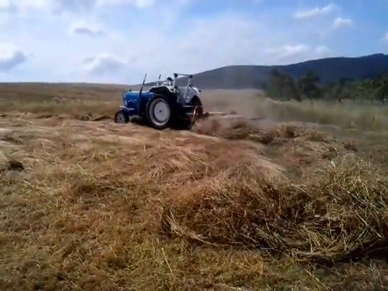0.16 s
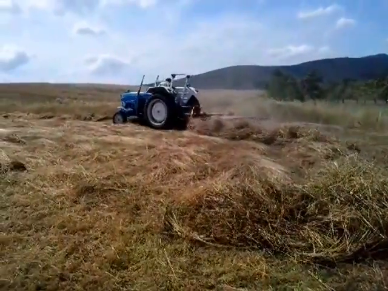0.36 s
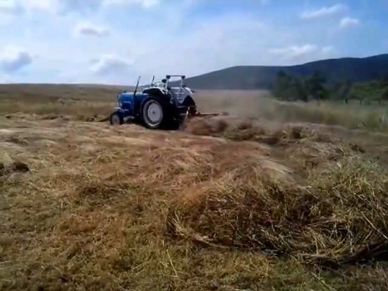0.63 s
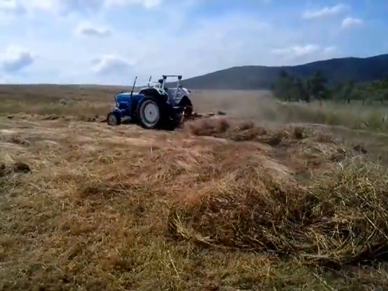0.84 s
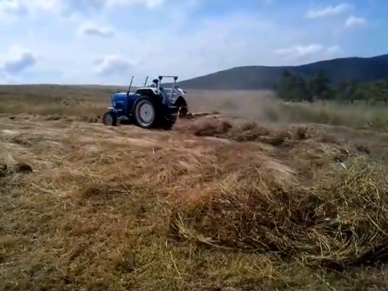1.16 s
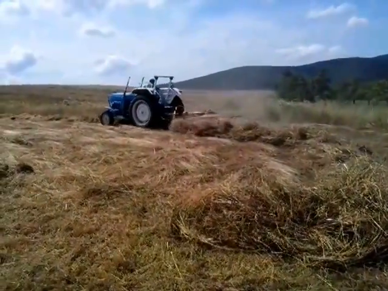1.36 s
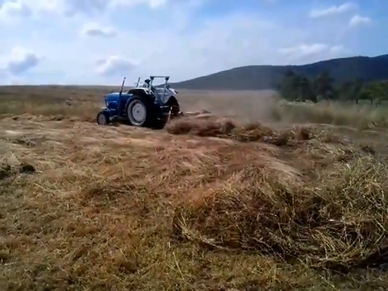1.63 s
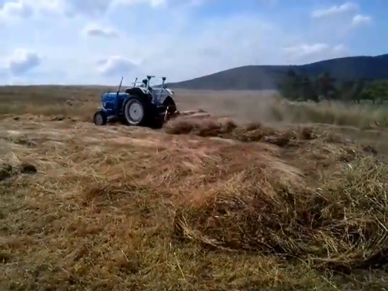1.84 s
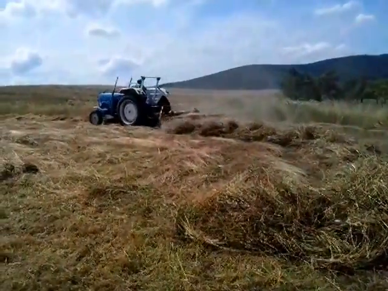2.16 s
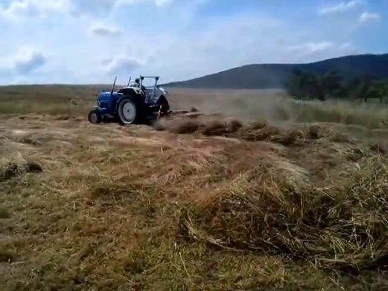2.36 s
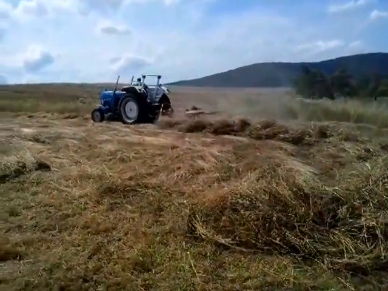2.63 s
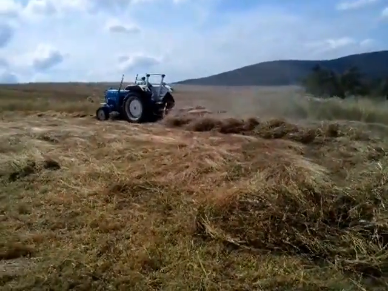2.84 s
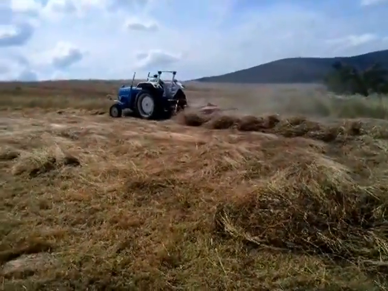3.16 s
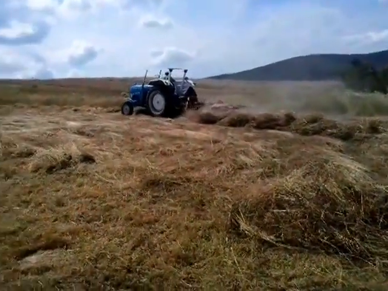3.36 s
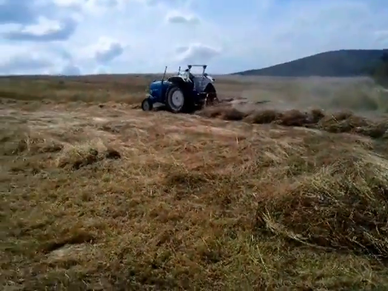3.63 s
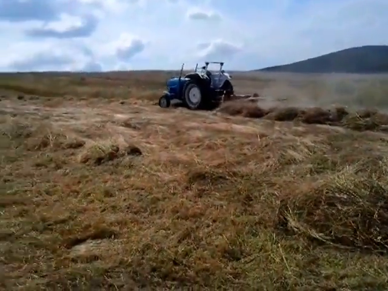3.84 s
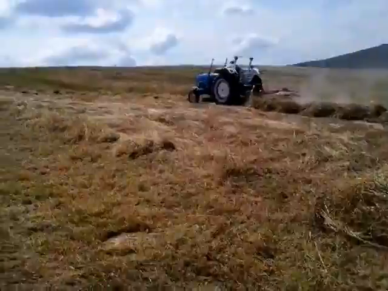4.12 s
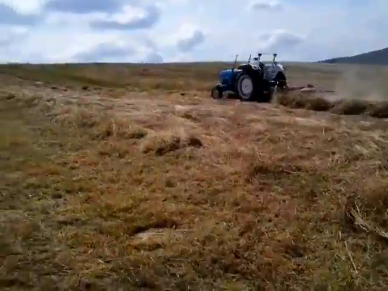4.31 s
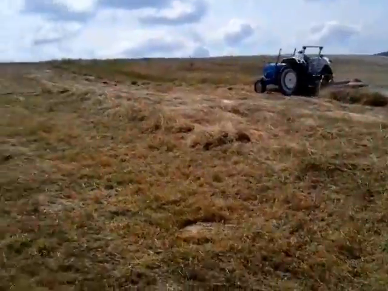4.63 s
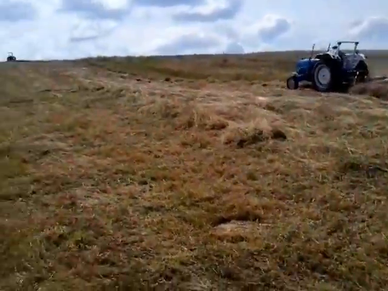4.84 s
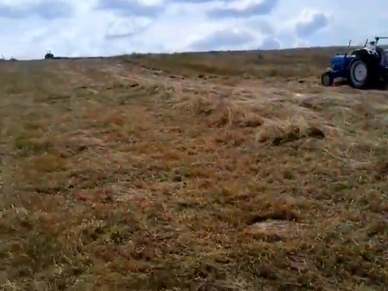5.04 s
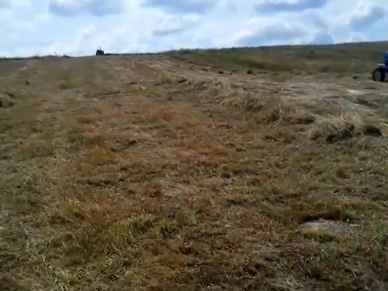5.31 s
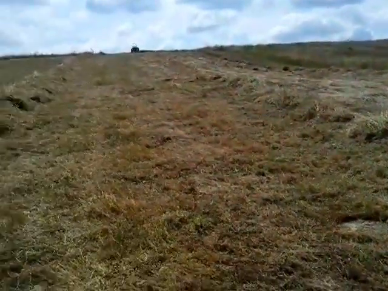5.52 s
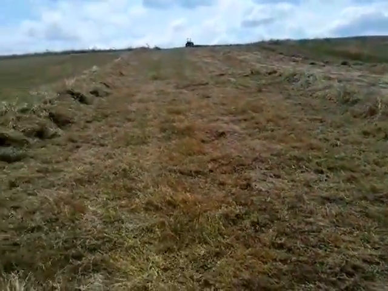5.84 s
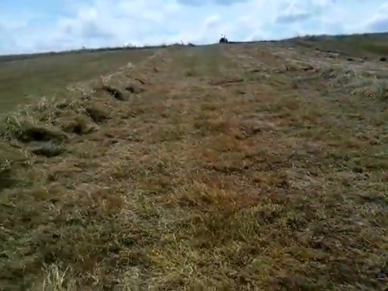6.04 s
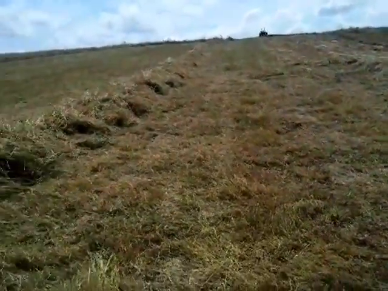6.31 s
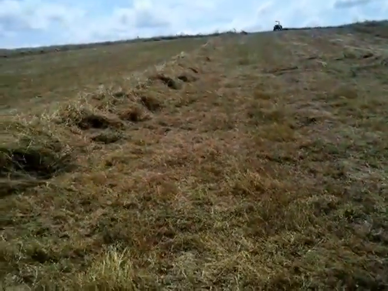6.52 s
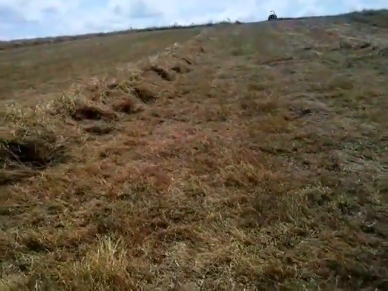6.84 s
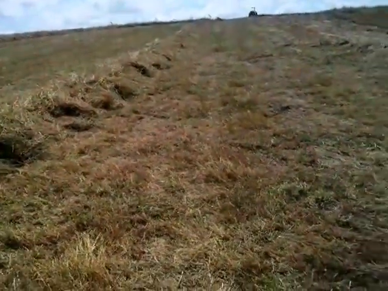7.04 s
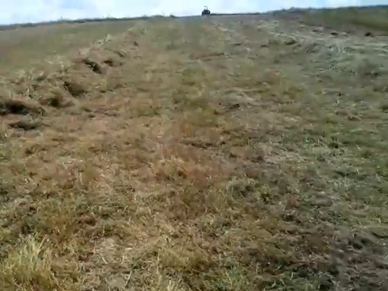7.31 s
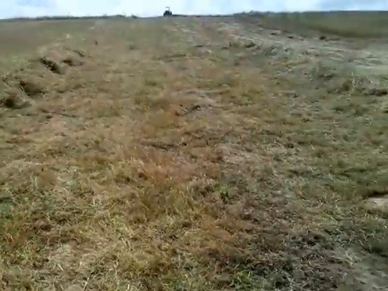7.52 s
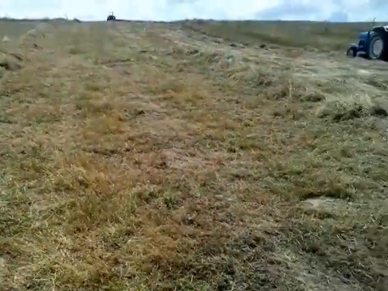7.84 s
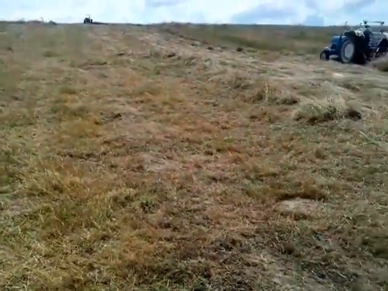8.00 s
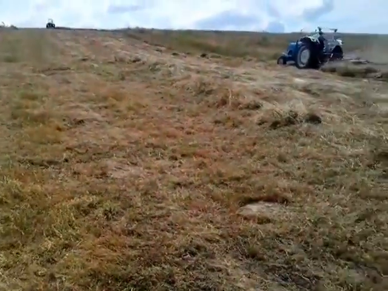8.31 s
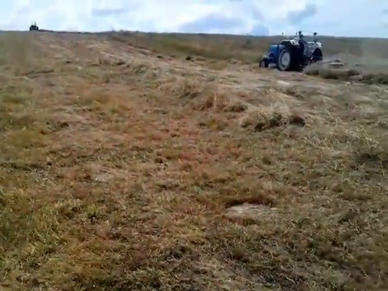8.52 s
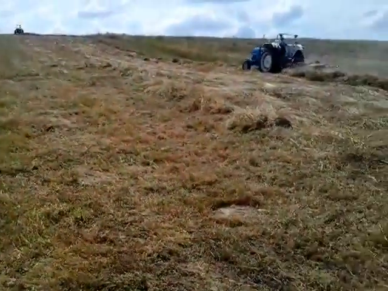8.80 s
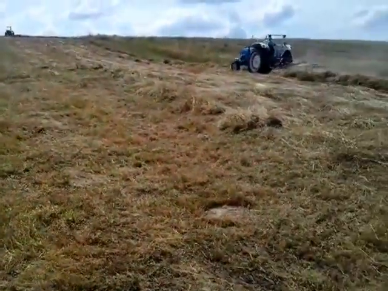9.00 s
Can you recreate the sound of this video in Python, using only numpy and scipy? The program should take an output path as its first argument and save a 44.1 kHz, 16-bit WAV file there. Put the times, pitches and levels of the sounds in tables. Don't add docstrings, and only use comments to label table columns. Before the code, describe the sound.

A diesel tractor throbs steadily some way off, its hay rake rattling and swishing through dry stalks, while wind gusts thump the microphone.

```python
import sys
import numpy as np
from scipy import signal
from scipy.fft import rfft, irfft, next_fast_len
from scipy.io import wavfile
from scipy.ndimage import uniform_filter1d, map_coordinates

SR = 44100
rng = np.random.default_rng(int(sys.argv[2]) if len(sys.argv) > 2 else 0)


def voltage_ratio(decibels):
    exponent = np.asarray(decibels, float) / 20
    return 10 ** exponent


def pcm_store(signal):
    levels = np.round(np.clip(np.atleast_2d(signal), -1, 1) * 32767)
    wavfile.write(sys.argv[1], SR, levels.astype(np.int16).T)


N = 403956
TIME = np.arange(N) / SR


def unit(x):
    return x / np.sqrt(np.mean(x ** 2) + 1e-20)


def along(points, hz):
    f, v = np.transpose(points)
    return np.interp(np.log(hz + 1), np.log(f + 1), v)


def curves(rows):
    s, *cols = np.transpose(rows)
    return [np.interp(TIME, s, c) for c in cols]


def wobble(rate):
    coarse = TIME[::32]
    knots = rng.standard_normal(int(N * rate / SR) + 4)
    return np.interp(TIME, coarse, map_coordinates(knots, [coarse * rate]))


def filtered(x, response):
    m = next_fast_len(N + SR // 2)
    return irfft(rfft(x, m) * response(np.fft.rfftfreq(m, 1 / SR)), m)[..., :N]


def add(track, s, shape):
    part = track[round(s * SR):][:len(shape)]
    part += shape[:len(part)]


def firings():
    # (time [s], rate [firings/s])
    firing_rate = [(0, 35.9), (1.1, 35.9), (1.4, 35.54), (3.15, 35.54), (3.4, 36.03), (6.9, 36.03),
                   (7.1, 36.3), (7.95, 36.3), (8.15, 36), (9.2, 36)]
    on_beat = 2.5035
    count = np.cumsum(curves(firing_rate)[0]) / SR
    return count - np.interp(on_beat, TIME, count)


def exhaust(count):
    cylinders = [0, 0.32, 1]
    # (frequency [Hz], level [dB])
    pipe_colour = [(40, -32), (55, -21), (72, -3.5), (108, -3), (144, -2.5), (180, 0.5), (215, -5.5),
                   (252, 1), (290, -7.5), (400, -22), (900, -30)]
    at = np.flatnonzero(np.diff(np.floor(count)) > 0)
    strength_db = np.array(cylinders)[np.arange(len(at)) % len(cylinders)]
    pulses = np.zeros(N)
    pulses[at] = voltage_ratio(strength_db + 1.3 * rng.standard_normal(len(at)))

    def pipe(f):
        smear = np.exp(-1.9j * np.log(1 + f / 150))
        return voltage_ratio(along(pipe_colour, f)) * smear
    return unit(filtered(pulses, pipe))


def gear_whine(count):
    # (multiple of the firing rate, level over the exhaust [dB], change as the gearbox turns away [dB/s])
    gears = [(18, -7.5, -.15), (21, -14, -.3), (21.65, -8, -.8), (26.3, -14, 0), (32.5, -11, -.5)]
    out = np.zeros(N)
    for multiple, db, fade in gears:
        level = voltage_ratio(db + fade * (TIME - 4) + 2.2 * wobble(5.5))
        out += level * np.sin(2 * np.pi * multiple * count + 0.45 * wobble(8))
    return out


def rolling():
    # (frequency [Hz], level [dB per Hz])
    rumble_colour = [(25, -34), (60, -10.5), (130, -10), (250, 2), (380, -7.5), (480, -6), (700, -25)]
    uneven = voltage_ratio(1.6 * wobble(7.8)) * rng.standard_normal(N)
    return unit(filtered(uneven, lambda f: voltage_ratio(along(rumble_colour, f))))


def engine(count):
    # (time [s], exhaust level [dB], boom of the silencer over that [dB])
    distance = [(0, -41, 6), (2, -40, -1), (4, -41, 3), (6, -40, -23), (8, -41.5, -33), (9.2, -41.5, -22)]
    # (frequency [Hz], width [Hz])
    boom_hz, boom_width_hz = (160, 15)
    pipe = exhaust(count)
    boom = unit(filtered(pipe, lambda f: 1 / (1 + ((f - boom_hz) / boom_width_hz) ** 2)))
    level_db, boom_db = curves(distance)
    mix = voltage_ratio(.3 + 0.9 * wobble(3.04)) * pipe + voltage_ratio(boom_db - 12) * boom
    return voltage_ratio(level_db) * (mix + gear_whine(count) + voltage_ratio(-3.2) * rolling())


def layers_db():
    # (time [s], load [dB], dry hay in the tines [dB], tinwork facing the port [dB])
    work = [(0.0, -29, 2.5, 1), (0.64, -25.5, -5, 0), (0.84, -25, -3, 0), (1.35, -26.5, -1.5, 0.5),
            (1.81, -25, -2.5, 0), (2.02, -26.5, -4, 0), (3.72, -27.5, -3.5, 0), (4.31, -26, 0.5, -1),
            (4.49, -23, 2, -1.5), (4.95, -29, 4, -1), (5.64, -27.5, 1.5, 1), (6.15, -32, 4.5, 3.5),
            (6.55, -26.5, -0.5, -1), (6.84, -28, 1.5, 1), (7.6, -29.5, 0.5, -1), (8.04, -28, -2, -3),
            (8.57, -33, 1.5, 3.5), (9.16, -30, -5.5, -0.5)]
    layer_db = [-7, -7.5, -12, -12.5]
    hay_share = [0, 0.069, 1, 0.63]
    fade = [-0.11, -0.0081, 0.24, 0.15]
    load_db, hay_db, tin_db = curves(work)
    out = load_db + np.outer(hay_share, hay_db) + np.outer(fade, TIME - 4.5) + np.array(layer_db)[:, None]
    return out + np.outer([1, 0, 0, 0], tin_db)


def working_bed(count):
    bed = voltage_ratio(layers_db())
    knock = np.exp(-3.5 * (2 * count % 1))
    bed *= 1 + np.array([[.15], [.2], [.22], [.12]]) * (knock - knock.mean())
    t = np.arange(SR // 6) / SR
    starts = (rng.random((4, N)) < 45 / SR) * rng.exponential(size=(4, N))
    starts[1:] += 1.5 * starts[:-1]
    scuff = t / 0.0035 * np.exp(1 - t / 0.004)
    scuffs = signal.oaconvolve(starts, scuff[None], axes=1)[:, :N]
    return bed ** 2 * (1 + np.array([[.15], [.18], [.22], [.3]]) * abs(scuffs))


def add_slaps(power):
    # (time [s], level [dB], centre [octaves above 1 kHz],
    # spread [octaves])
    slaps = [(0.022, -28, 1.85, 0.55), (0.6773, -23.5, 2.25, 0.52), (0.711, -26, 1.2, 0.95),
             (1.454, -28, 2.1, .6), (1.541, -28, 1, 2.4), (1.862, -24, 1.3, 1.04), (2.207, -27.5, .6, 0.88),
             (2.243, -27.5, 1.65, 1.14), (2.37, -29.5, 1.9, 0.69), (3.06, -23, 1.5, 0.56),
             (3.71, -29.5, 1.7, 0.72), (3.734, -24.5, 1.15, 0.83), (3.807, -33, 1.8, 1.6),
             (4.175, -29.5, 2.9, .6), (4.348, -19, 2.9, 0.54), (4.413, -18, 1, 1.04),
             (5.011, -26.5, 2.8, 0.47), (5.046, -28, 1.3, 1.3), (5.48, -26.5, 2.1, 0.71),
             (5.6455, -27, 1.9, .7), (5.8045, -29, 2.3, 1.2), (5.858, -27.5, 2.6, 0.76),
             (6.2287, -25, 2.36, 0.5), (6.3589, -27, 2.74, 0.57), (6.519, -27, 2.1, 0.5),
             (6.938, -25.5, 1.5, 0.76), (7.0209, -23.5, 2.67, 0.41), (7.071, -26, 1.06, 1),
             (7.346, -28, 2.65, 0.88), (8.0015, -26.5, 1.1, 0.83),
             (0.283, -27, .3, 0.87), (0.379, -32, 2.7, .6), (0.503, -34.5, .3, .7), (0.694, -26, 1, 1.2),
               (0.753, -30, 1.8, .4), (0.913, -27, 1.7, .5), (0.99, -30, .4, .7), (1.043, -29.5, 2, .5),
               (1.2, -28, 2.5, .4), (1.238, -37, .3, .7), (1.598, -26, .3, .7), (1.656, -30, 2.5, .7),
               (1.676, -28, 2.8, .4), (1.702, -30, 2, .5), (2.067, -34, 2.7, .7), (2.31, -30, 2.4, 0.51),
               (2.389, -29, 2.2, 0.46), (2.675, -33, 1.6, .6), (2.907, -35.5, 3.8, .4),
               (3.01, -32, 2.7, .7), (3.367, -30.5, 1.8, .4), (3.407, -33, 2.2, .7), (3.777, -33.5, 2, .6),
               (3.925, -34, 3, .5), (4.232, -32, 2.8, .4), (4.336, -25, 2.7, .5), (4.599, -34, 3.4, 0.83),
               (4.668, -29, 3.3, .6), (4.975, -30.5, .2, .6), (5.202, -34, 2.5, .4),
               (5.291, -34, 2.5, 0.72), (5.562, -33, .4, .7), (6.39, -31, 2.9, 0.45), (6.57, -30, 2.3, .5),
               (6.742, -34, 2.8, 0.37), (6.865, -29, 2.9, 0.36), (7.483, -30.5, .4, .7),
               (7.511, -36, 2.5, .4), (7.556, -38, 2.8, 0.44), (8.287, -34, 2.6, .6),
               (8.376, -36.5, 2.7, .5), (8.777, -35, 1.7, .6)]
    layer_oct = [.5, 2, 2.85, 3.5]
    lag_s_per_oct = .003
    t = np.arange(SR // 6) / SR
    blow = 0.86 * np.exp(-(t / 0.014) ** 2)
    falling_hay = 0.5 * np.exp(-t / 0.062)
    shape = (1 - np.exp(-t / 0.00066)) * (blow + falling_hay)
    for s, db, centre, spread in slaps:
        for track, octave in zip(power, layer_oct):
            lag = lag_s_per_oct * max(centre + spread - octave - .7, 0)
            level = voltage_ratio(db - 4.25 * ((octave - centre) / spread) ** 2)
            add(track, s + lag, (level * shape) ** 2)


def add_rustles(power):
    # (time [s], level [dB], length [s])
    rustles = [(0.802, -30.5, 0.041), (0.957, -30, 0.025), (1.09, -29, 0.02), (1.41, -27, 0.025),
               (1.607, -24.5, 0.027), (1.908, -27.5, 0.046), (2.488, -27, 0.01), (2.617, -29, 0.028),
               (2.729, -30.5, 0.053), (3.012, -37, .015), (3.25, -39, 0.067), (4.961, -29, .03),
               (7.652, -37, .015), (8.008, -31, .012), (4.56, -33, 0.018), (4.134, -25, 0.0099),
               (4.418, -28, 0.052), (4.545, -22.5, 0.018), (4.718, -26, 0.036), (4.918, -24.5, 0.01),
               (5.243, -27, 0.016), (5.325, -26, 0.012), (5.482, -29.5, 0.069), (5.668, -30, 0.026),
               (6.032, -27.5, 0.052), (6.312, -28.5, 0.031), (6.49, -30, 0.029), (6.78, -29, 0.038),
               (7.716, -35, 0.018), (7.774, -27.5, 0.018), (7.859, -30.5, 0.023), (7.91, -28, 0.018),
               (8.067, -30, 0.015), (8.248, -30.5, 0.034), (8.56, -33, 0.029), (8.692, -34.5, 0.085)]
    t = np.arange(SR // 6) / SR
    for s, db, length in rustles:
        swell = voltage_ratio(2 * db - 6.5) * (1 - np.exp(-t / 0.0033)) * np.exp(-(t / length) ** 3)
        add(power[3], s, swell)
        add(power[2], s, 0.5 * swell)
        add(power[1], s, 0.55 * swell)


def patchy(patchy_db):
    hz, t, z = signal.stft(rng.standard_normal(N), SR, nperseg=512)
    field = uniform_filter1d(rng.standard_normal(z.shape), size=8, axis=0)
    field = uniform_filter1d(field, size=4, axis=1)
    return hz, t, z * voltage_ratio(patchy_db * unit(field))


def four_bands(patchy_db):
    # (time [s], bearing [0 facing, 1 turning, 2 turned away, 3 turned back])
    held = [(0, 0), (4, 0), (4.7, 1), (5.5, 1), (5.9, 2), (6.9, 2), (7.3, 2.7), (7.7, 3), (8.45, 3),
            (8.7, 2.55), (9.2, 2.55)]
    # (frequency [Hz], level [dB per Hz])
    machine_colour = [(250, -35), (500, -12.5), (700, -2.5), (1300, 1), (2200, -1.5), (4000, -2),
                      (5500, -3), (8200, -3), (10500, -7.5), (13000, -12), (15800, -15)]
    # (frequency [Hz], width [Hz], depth [dB], below zero a lift)
    bearings = [
        [(1070, 59, 13), (1235, 83, -4.5), (1624, 330, 9.5), (2392, 396, 12.5), (3060, 200, 6.5),
         (4640, 140, 2.5), (5900, 400, 6.5), (6440, 230, -2), (6640, 160, 11), (6820, 210, -4.5),
         (7500, 180, 7), (9090, 1460, 7)],
        [(980, 51, 14), (1450, 175, 13), (2330, 790, 5.5), (3550, 210, -3.5), (4240, 500, -6.5),
         (5800, 300, -1), (9450, 2000, 5)],
        [(985, 190, 1), (1484, 210, 9), (2500, 290, 11), (3140, 340, 5.5), (6040, 160, 10), (9230, 1200, 8),
         (11300, 510, 0)],
        [(1252, 80, -8.5), (1460, 247, 8.5), (1790, 150, -6.5), (2150, 780, 4.5), (3030, 120, 8), (4130, 50, 0),
         (4230, 470, -5), (9500, 1900, 5), (11400, 760, 0.5)],
    ]
    edges_hz = [2500, 5500, 9000]
    hz, t, z = patchy(patchy_db)
    turn = np.interp(t, *np.transpose(held))
    colour_db = along(machine_colour, hz)[:, None]
    for k, hollows in enumerate(bearings):
        dips_db = sum(db * np.exp(-2 * ((hz - centre_hz) / w) ** 2) for centre_hz, w, db in hollows)
        nearness = np.clip(1 - abs(turn - k), 0, 1)
        colour_db = colour_db - np.outer(dips_db, nearness)
    below = [0 * hz] + [1 / (1 + (hz / edge) ** 12) for edge in edges_hz] + [1 + 0 * hz]
    bands = voltage_ratio(colour_db) * np.sqrt(abs(np.diff(below, axis=0)))[:, :, None]
    bands /= np.linalg.norm(bands, axis=1, keepdims=True)
    parts = signal.istft(z * bands, nperseg=512)[1][:, :N]
    return parts / parts.std(axis=1, keepdims=True)


def stalk_hiss():
    # (time [s], level [dB], length [s])
    hisses = [(0.96, -40, .02), (1.411, -37, .015), (1.61, -37, .02), (3.01, -39, .015), (4.131, -39, .01),
              (4.955, -35, .025), (5.012, -37, .012), (5.668, -33, .026), (5.89, -39, .015),
              (6.03, -38, .05), (6.49, -38, .025), (7.648, -41, .012), (7.775, -37, .02),
              (7.912, -40, .015), (8.008, -39, .012), (8.2455, -26, 0.032), (8.41, -40, .02)]
    t = np.arange(SR // 6) / SR
    swell = np.zeros(N)
    for s, db, length in hisses:
        add(swell, s, voltage_ratio(db) * (1 - np.exp(-t / 0.001)) * np.exp(-(t / length) ** 3))
    hiss = filtered(rng.standard_normal(N), lambda f: 1 / (1 + (11000 / (f + 1)) ** 6))
    return swell * unit(hiss)


def rake(count):
    power = working_bed(count)
    add_slaps(power)
    add_rustles(power)
    machine = np.sum(np.sqrt(power) * four_bands(patchy_db=1.63), axis=0)
    return machine + stalk_hiss()


def tines():
    # (time [s], level [dB], frequency [Hz], t60 [s])
    pings = [(1.965, -29, 5100, .3), (3.534, -15, 6900, .05), (5.49, -18, 6900, .08),
             (2.16, -20, 3900, .07)]
    out, t = np.zeros(N), np.arange(SR // 6) / SR
    for s, db, hz, t60 in pings:
        ring = voltage_ratio(db - 60 * t / t60) * np.sin(2 * np.pi * hz * t)
        add(out, s, (1 - np.exp(-t / .005)) * ring)
    return out


def snap(hz):
    t = np.arange(200) / SR
    return (1 - np.exp(-t / .0001)) * voltage_ratio(-60 * t / 0.0019) * np.sin(2 * np.pi * hz * t)


def stalks():
    # (time [s], peak level [dB], frequency [Hz])
    snaps = [(4.43, 4, 7000), (3.0615, -11, 3900), (6.5262, -12, 4200), (6.2886, -16, 9000),
             (6.311, -11, 8000), (6.3172, -4, 10500), (6.3205, -3, 7500), (6.5202, -2, 4600),
             (6.523, -6, 5000), (6.7985, -8, 6040), (6.8046, 2.5, 7660), (7.0224, -3, 7300),
             (7.348, -5, 11700), (7.349, -6, 6100), (2.2445, -11, 5500), (0.76, -3, 5500), (6.4, -9, 4600),
             (7.4, -13, 6000), (5.8065, -15, 5000), (1.7, -13, 3500)]
    out = np.zeros(N)
    for s, db, hz in snaps:
        add(out, s, voltage_ratio(db + 4.0) * snap(hz))
    crackle = voltage_ratio(layers_db()[3] + 12)
    for hz in (5000, 8500, 12500):
        breaks = (rng.random(N) < 14 / SR) * rng.standard_normal(N) * crackle
        out += signal.oaconvolve(breaks, snap(hz))[:N]
    return out


def gusts():
    # (start time [s], hold [s], level [dB])
    blows = [(1.545, .03, -30), (1.806, 0.04, -30), (1.853, 0.034, -23), (1.902, 0.037, -24),
             (1.949, 0.06, -30), (2.427, 0.012, -37), (3.902, 0.035, -33), (4.326, 0.04, -33),
             (4.378, 0.063, -30), (4.45, 0.022, -27), (4.482, 0.045, -31), (4.533, 0.018, -29),
             (4.622, .012, -36), (5.782, 0.05, -29), (5.893, 0.033, -29), (5.95, 0.015, -26),
             (6.142, 0.044, -38), (6.447, 0.031, -31), (6.526, 0.082, -29.5), (6.623, 0.085, -27),
             (6.739, .025, -33), (6.809, 0.0093, -34), (6.845, 0.1, -30.5), (6.92, 0.11, -26.5),
             (7.094, 0.025, -30), (7.34, 0.049, -39.5), (7.66, .03, -40), (7.805, .02, -35),
             (8.444, 0.033, -43), (3.99, 0.15, -43), (4.729, 0.011, -30), (4.894, .01, -34),
             (8.34, .01, -43), (3.978, .012, -34), (3.63, 0.016, -39)]
    rise_s, fall_s = 0.0036, 0.009
    out, t = np.zeros(N), np.arange(SR // 2) / SR
    for s, hold, db in blows:
        fall = np.exp(-np.clip(t - hold, 0, None) / fall_s)
        add(out, s, voltage_ratio(db) * (1 - np.exp(-t / rise_s)) * fall)
    return out


def eddy(t, hz, turn):
    envelope = np.exp(-(t * hz / np.where(t < 0, 0.45, 0.95)) ** 2)
    phase = 2 * np.pi * (hz * t + turn)
    steep_face = 0.25 * np.exp(-(t * hz / 0.45) ** 2) * np.sin(2 * phase)
    return envelope * (np.sin(phase) + steep_face)


def wind():
    # (frequency [Hz], level [dB per Hz])
    buffet = [(24, -65), (40, -33), (59, -10.5), (243, 2), (542, -12), (746, -18), (811, -24), (919, -40),
              (1100, -46), (1430, -64), (2420, -120)]
    # (middle time [s], peak level [dB], frequency [Hz])
    eddies = [(1.5393, -8.5, 312), (1.5472, -15, 368), (1.8101, -18, 220), (1.8279, -20, 410),
              (1.8392, -17, 335), (1.8634, -9.5, 401), (1.8712, -11, 338), (1.8851, -10.5, 294),
              (1.9248, -11.5, 292), (1.9658, -22, 280), (1.9888, -15.5, 408), (3.0909, -16.5, 338),
              (4.3275, -16.0, 340), (4.3348, -7.5, 317), (4.3483, -10, 342), (4.3557, -14, 375),
              (4.366, -13, 325), (4.3957, -7.5, 242), (4.4177, -6, 250), (4.431, -6, 417),
              (4.44, -6.5, 294), (4.4602, -2, 286), (4.4688, -8.0, 295), (4.484, -13, 302),
              (4.5, -6.5, 408), (4.5072, -10.0, 322), (4.5214, -10, 364), (4.5367, -5, 309),
              (4.5457, 0, 418), (4.558, -13.5, 345), (4.7915, -17.5, 296), (5.5338, -15.5, 335),
              (5.7274, -18, 288), (5.808, -6.5, 374), (5.82, -9, 370), (5.8298, -5.5, 370),
              (5.924, -16, 356), (5.9642, -12, 380), (6.5982, -12.5, 260), (6.636, -22, 273),
              (6.6443, -9.0, 310), (6.6634, -7.5, 317), (6.6728, -12.5, 293), (6.6852, -16, 263),
              (6.7044, -19, 319), (6.739, -10.5, 320), (6.7503, -19, 299), (6.8066, -17.0, 271),
              (6.8642, -17.0, 297), (6.8854, -16, 288), (6.909, -13.0, 277), (6.9448, -10.0, 301),
              (6.9654, -6, 302), (6.9812, -10, 382), (6.9937, -13.5, 301), (7.0098, -19, 262),
              (7.0224, -24, 286), (7.1125, -20.5, 263), (7.1298, -18, 314), (8.1993, -17.5, 373),
              (1.566, -20, 300), (1.892, -12, 342), (2.017, -21, 480), (2.43, -25, 245), (3.902, -19.5, 209),
             (3.93, -19, 300), (4.455, -8, 520), (4.5405, -11, 270), (1.968, -18, 230), (6.877, -18, 260),
             (6.893, -17, 280), (6.955, -14, 250), (7.035, -22, 240), (5.79, -19, 330), (4.642, -18.5, 300),
             (5.911, -20, 380), (5.959, -14, 440), (5.97, -15, 380), (6.187, -21, 250), (6.465, -21, 390),
             (8.455, -26, 200)]
    swirl_hz = [230, 290, 380]
    swirl_per_s, swirl_db = 25, -8
    breeze_db = -43
    uneven = voltage_ratio(3.5 * wobble(70)) * rng.standard_normal(N)
    roar = unit(filtered(uneven, lambda f: voltage_ratio(along(buffet, f))))
    gust = gusts()
    out = (gust + voltage_ratio(breeze_db + 2.0 * wobble(2.73))) * roar
    t = np.arange(-SR // 80, SR // 80) / SR
    for hz in swirl_hz:
        kicks = (rng.random(N) < swirl_per_s / SR) * rng.standard_normal(N) * gust * voltage_ratio(swirl_db)
        out += signal.oaconvolve(kicks, eddy(t, hz, 0.04), mode="same")
    for s, db, hz in eddies:
        add(out, s + t[0], voltage_ratio(db) * eddy(t, hz, rng.random()))
    return filtered(out, lambda f: 1 / (1 + (80 / (f + 1)) ** 3))


def scene():
    count = firings()
    return np.tile(engine(count) + rake(count) + tines() + stalks() + wind(), (2, 1))


def roll_off(x):
    return signal.sosfilt(signal.butter(12, 16680, fs=SR, output="sos"), x)


def record(dry):
    limited = filtered(dry[0], lambda f: f < 15830)
    return roll_off(np.clip(np.tile(limited, (2, 1)), -1, 1))


dry = scene()
out = record(dry)
pcm_store(out)
```